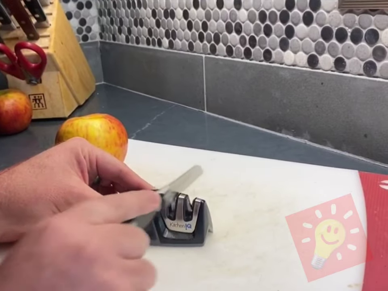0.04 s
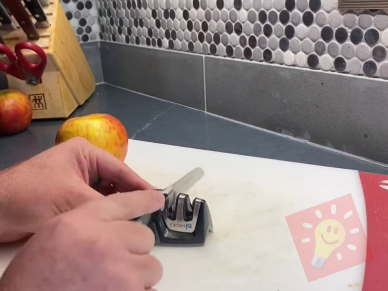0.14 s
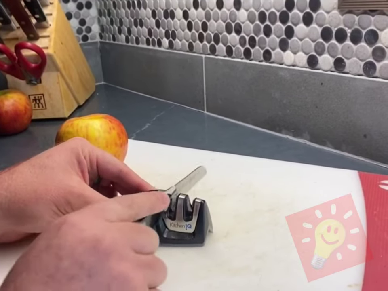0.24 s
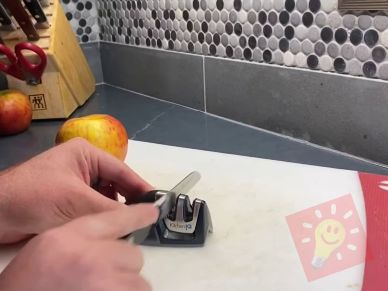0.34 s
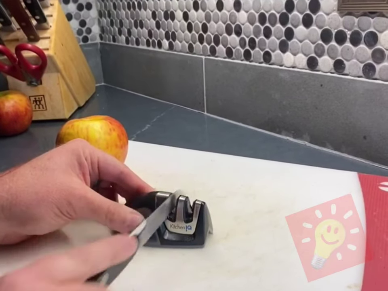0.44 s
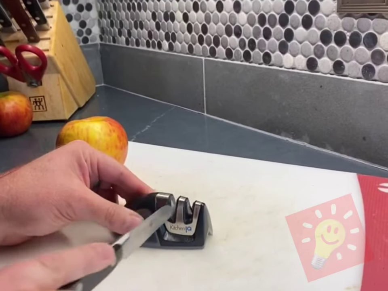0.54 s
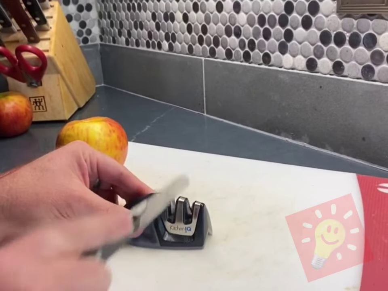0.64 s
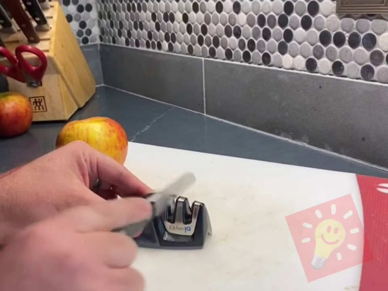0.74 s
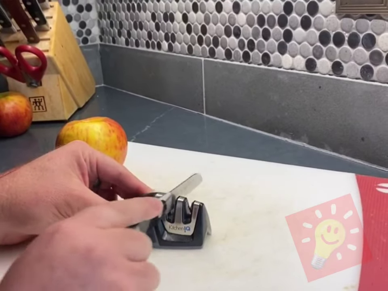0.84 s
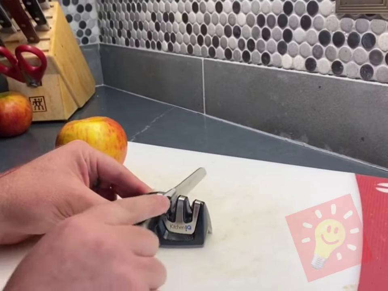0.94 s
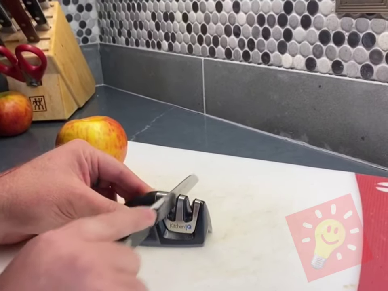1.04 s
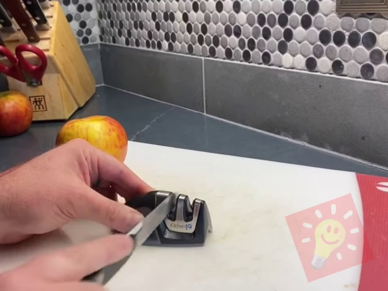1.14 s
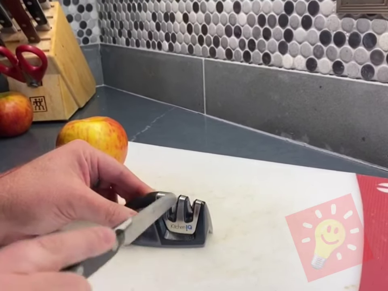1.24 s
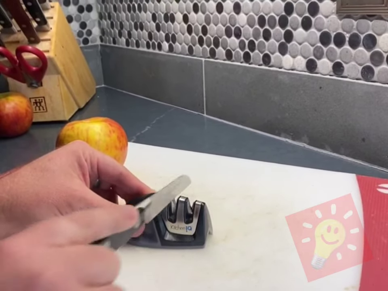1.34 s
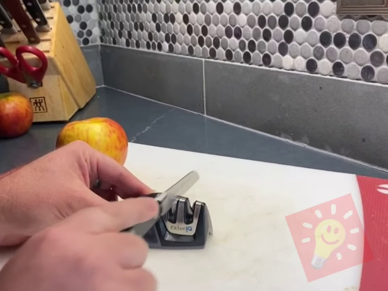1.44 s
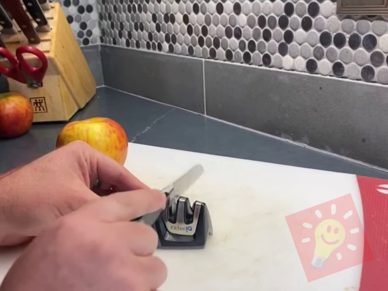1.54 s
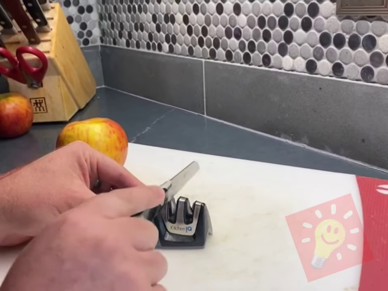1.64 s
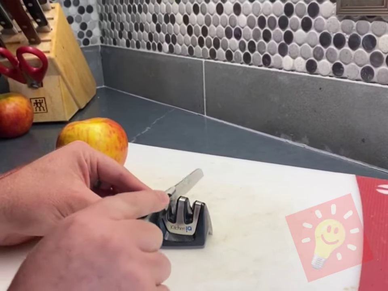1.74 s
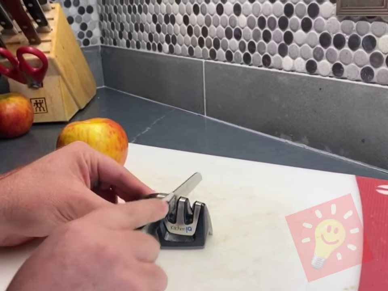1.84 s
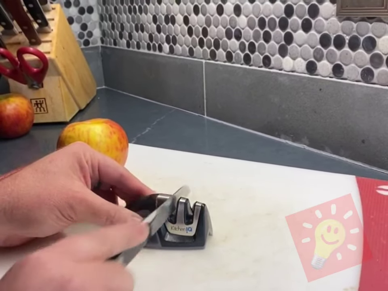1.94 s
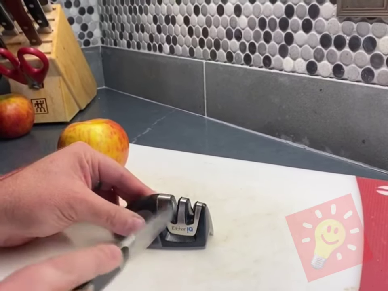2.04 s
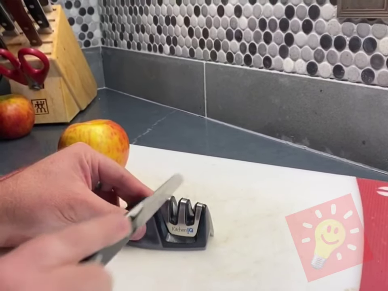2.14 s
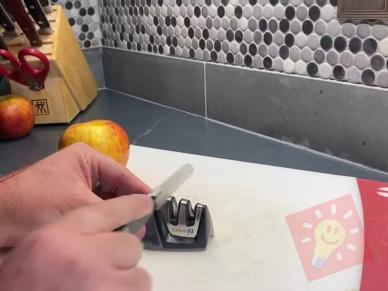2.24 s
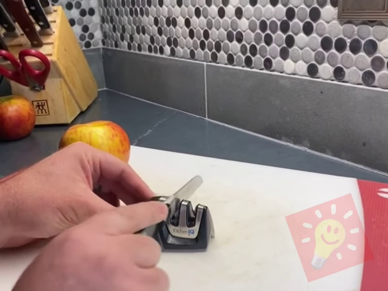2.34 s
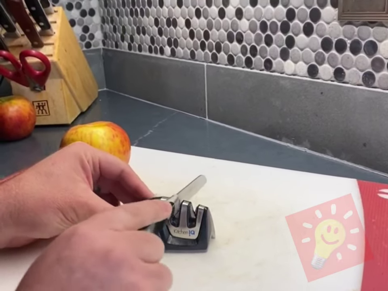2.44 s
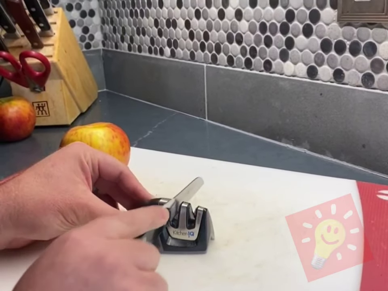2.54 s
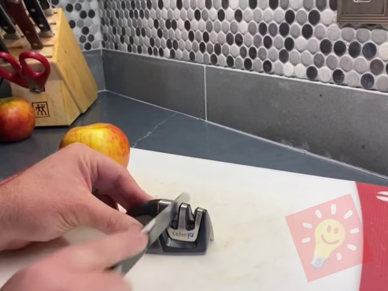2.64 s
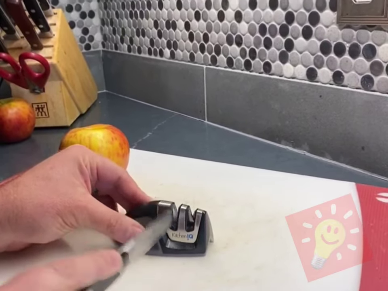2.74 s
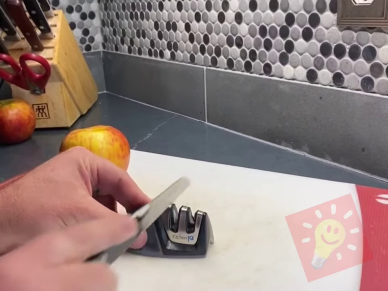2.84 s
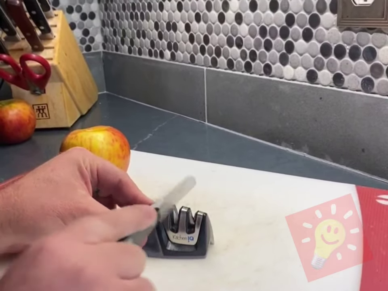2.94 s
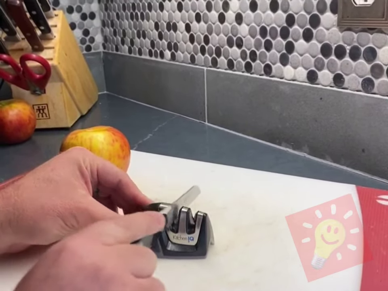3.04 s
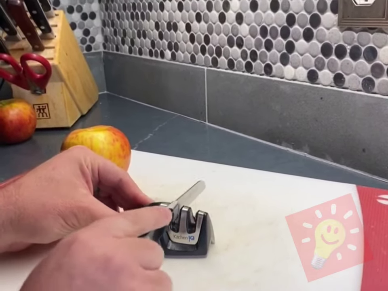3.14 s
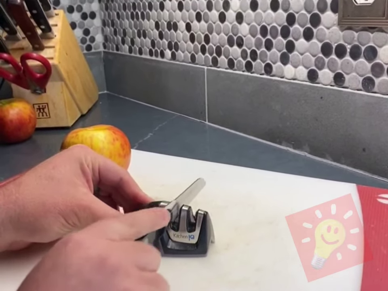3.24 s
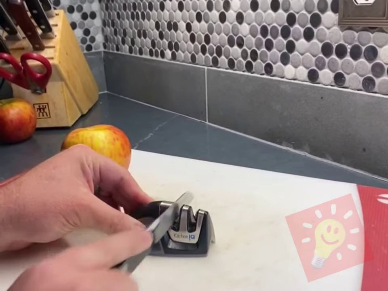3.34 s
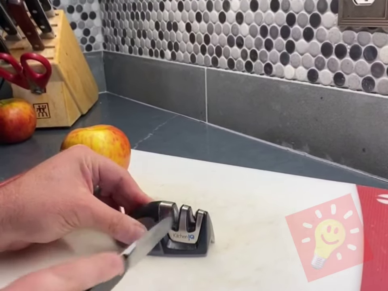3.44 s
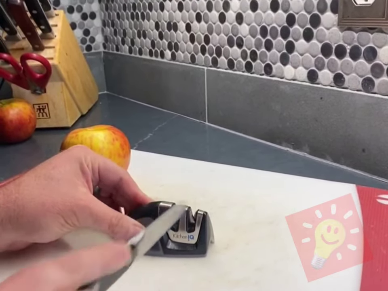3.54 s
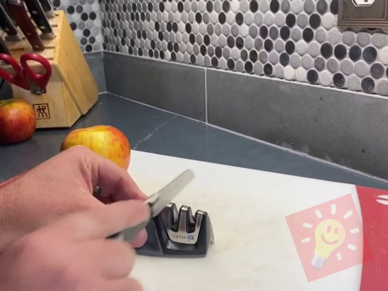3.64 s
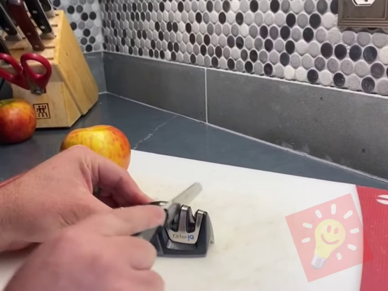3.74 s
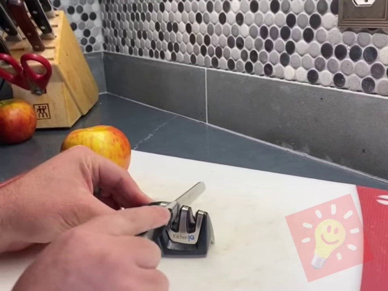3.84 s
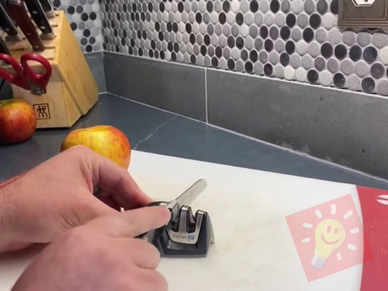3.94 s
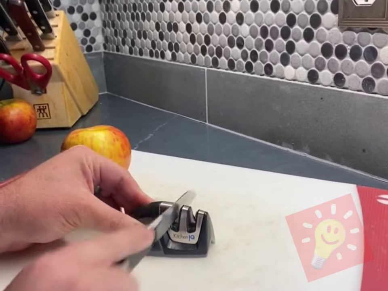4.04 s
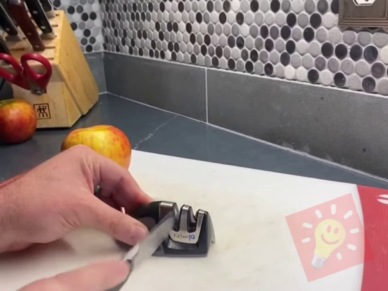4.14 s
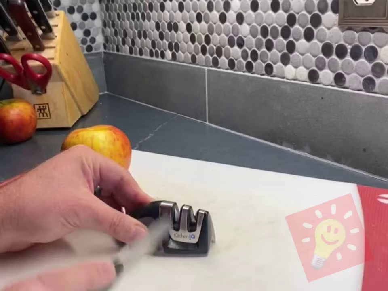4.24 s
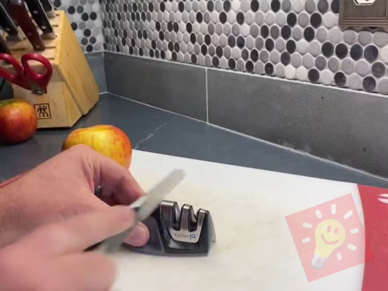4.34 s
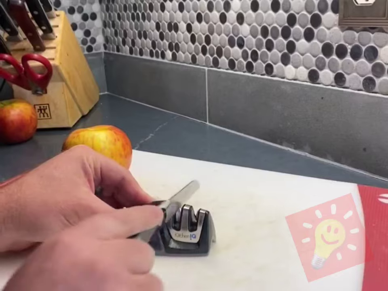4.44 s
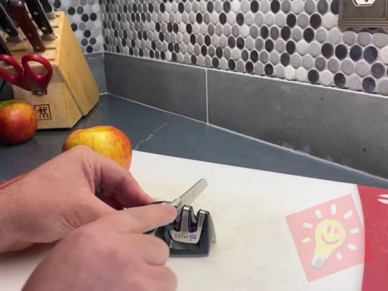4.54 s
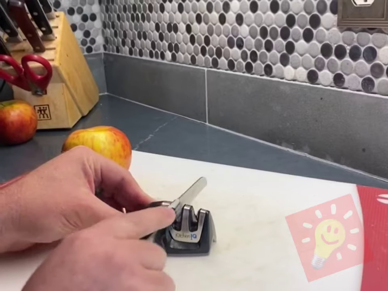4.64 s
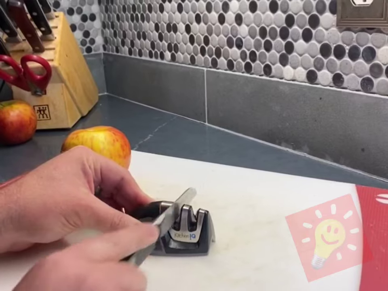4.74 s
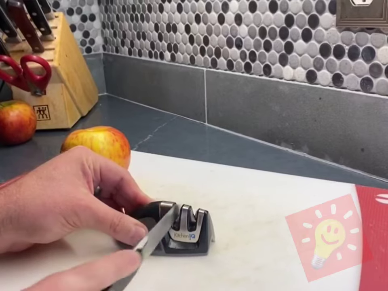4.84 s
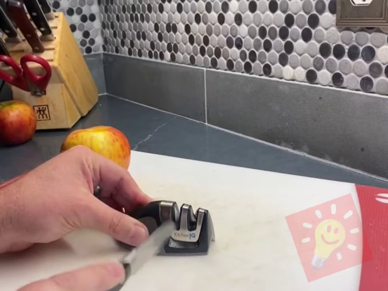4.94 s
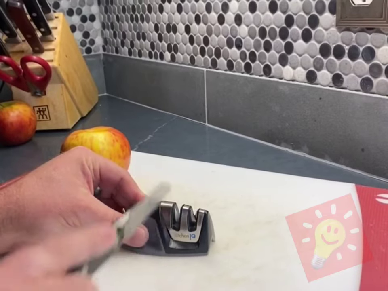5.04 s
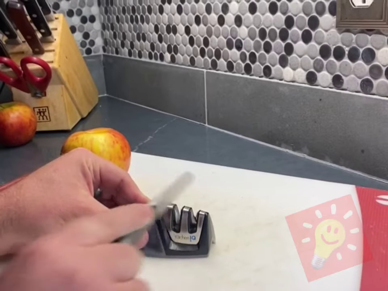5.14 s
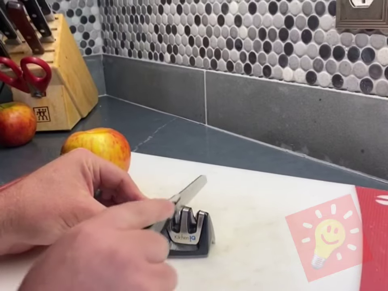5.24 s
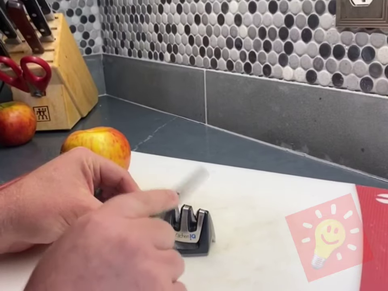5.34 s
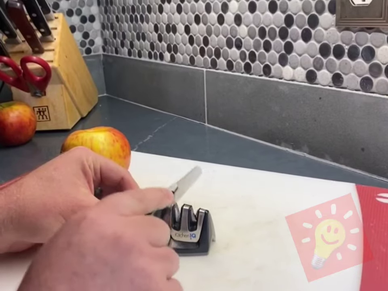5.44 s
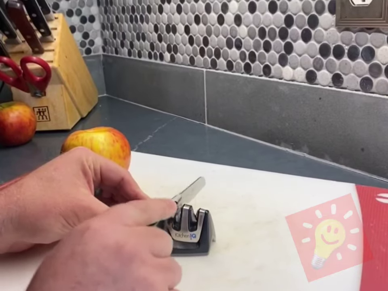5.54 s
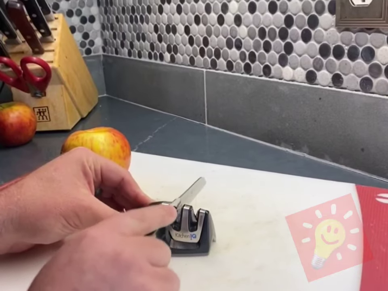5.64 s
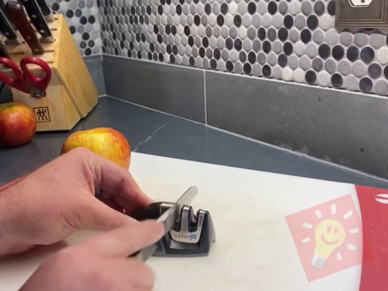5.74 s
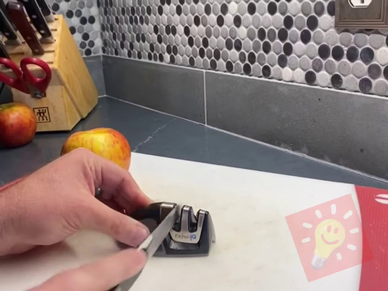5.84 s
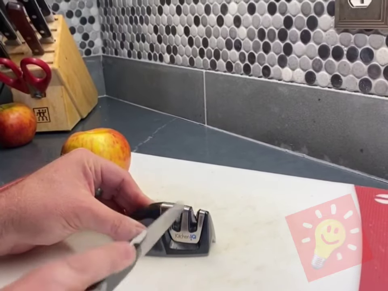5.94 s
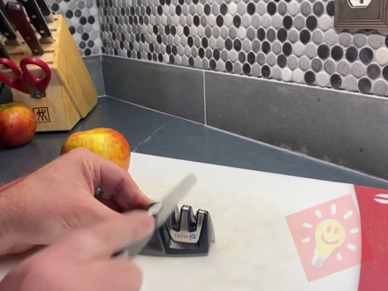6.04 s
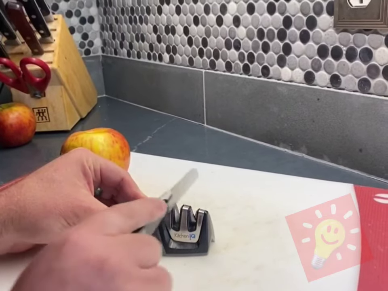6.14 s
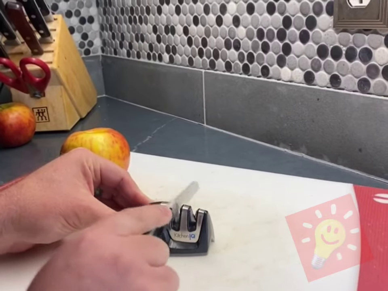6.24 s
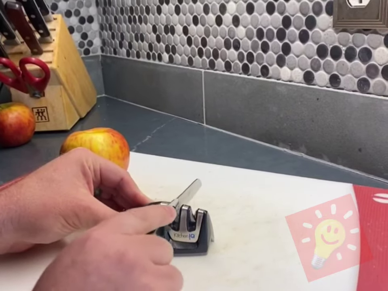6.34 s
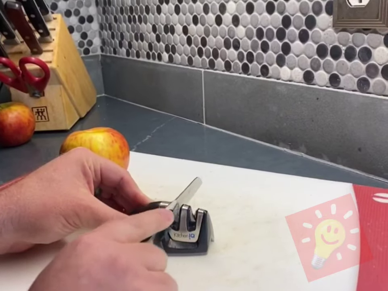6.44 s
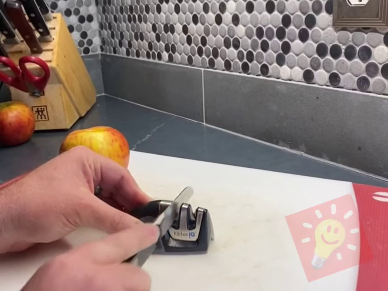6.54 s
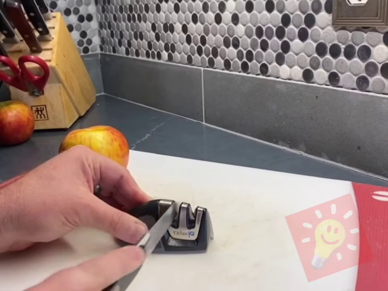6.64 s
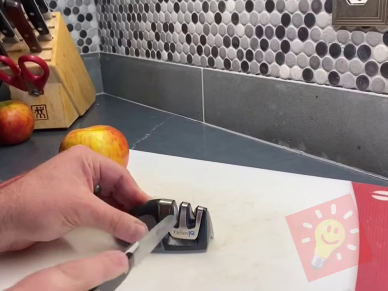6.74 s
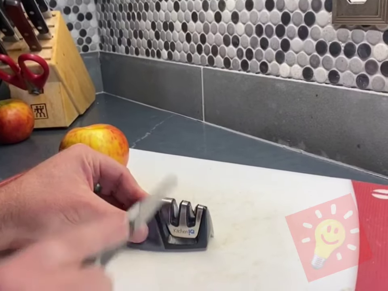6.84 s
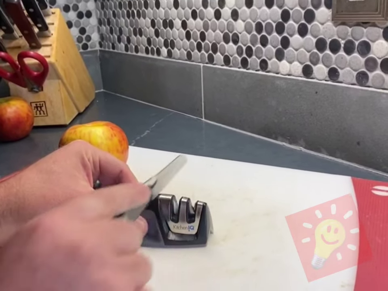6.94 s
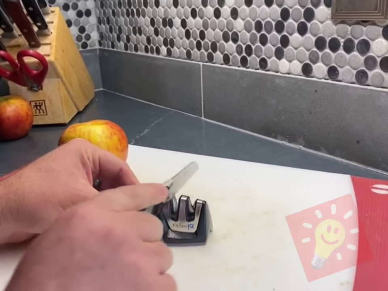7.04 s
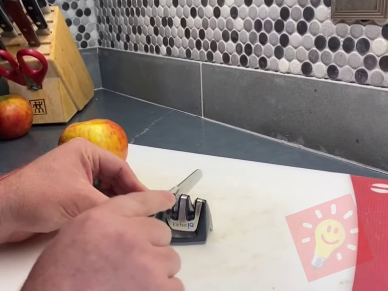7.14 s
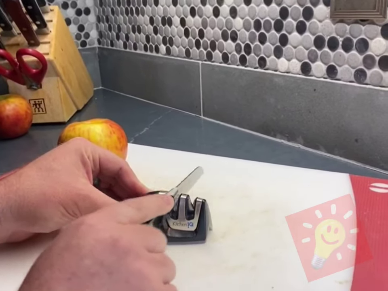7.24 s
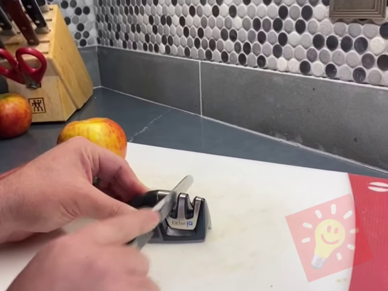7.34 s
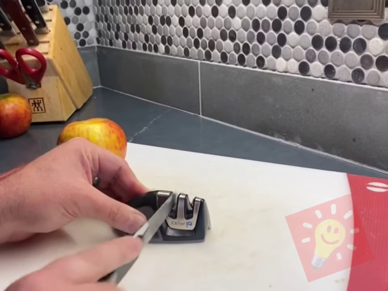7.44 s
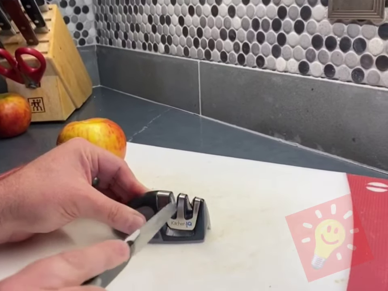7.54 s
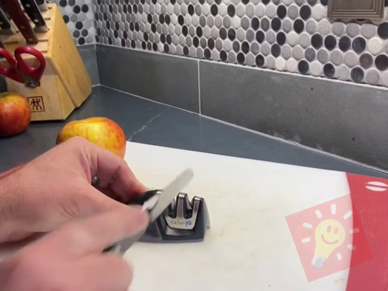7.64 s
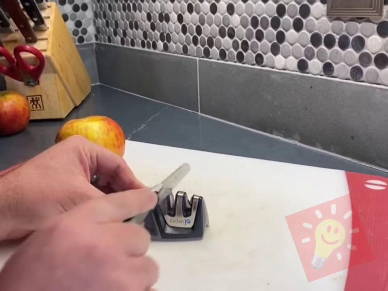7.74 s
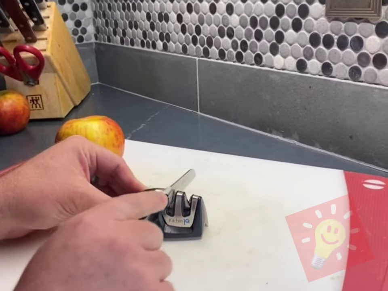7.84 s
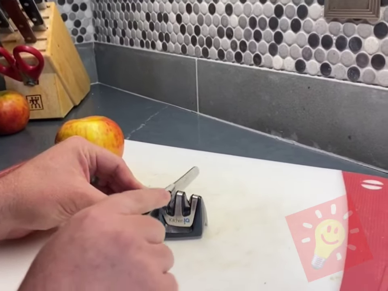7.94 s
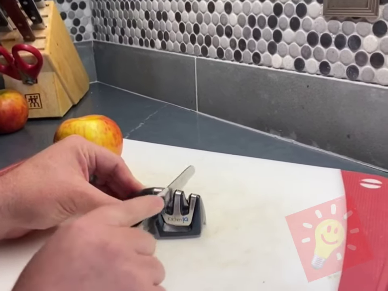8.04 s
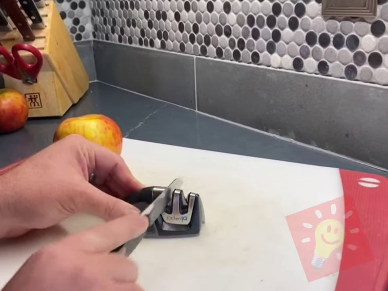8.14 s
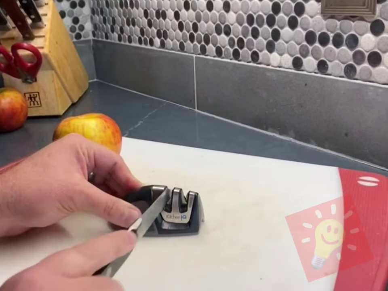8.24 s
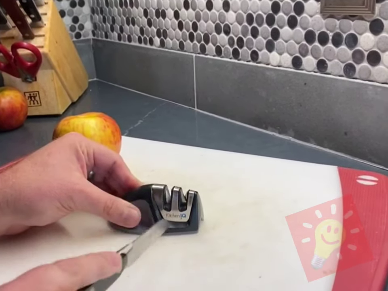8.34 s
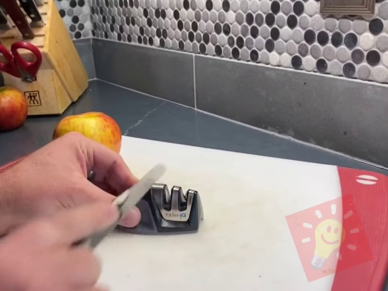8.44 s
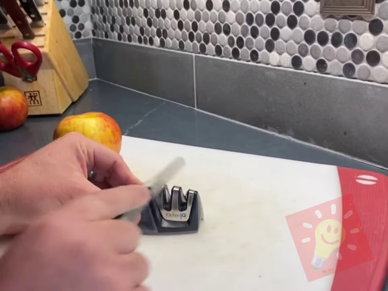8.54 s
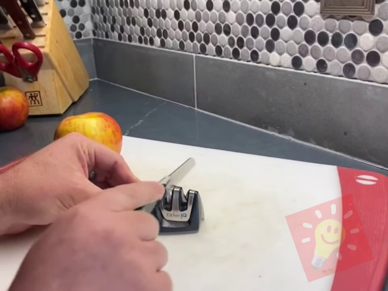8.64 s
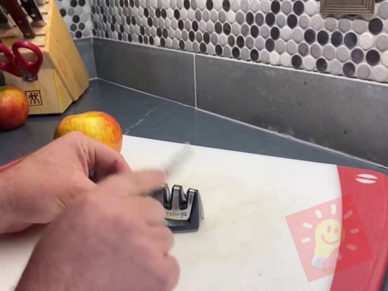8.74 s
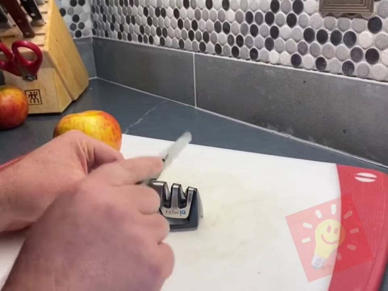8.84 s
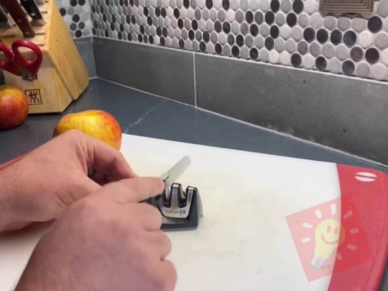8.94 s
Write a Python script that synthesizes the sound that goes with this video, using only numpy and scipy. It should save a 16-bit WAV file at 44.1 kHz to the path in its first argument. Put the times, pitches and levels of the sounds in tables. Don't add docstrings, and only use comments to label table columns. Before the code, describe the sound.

Regular knife sharpening heard close up: tick and small bump, brief raspy metallic zip that brightens toward its end, then a dry clack of the blade tip on the board. The cycle repeats roughly every 0.7 seconds, with two scrapes softer and some knocks doubled or missing. Short reflections off hard tiles surround it, over a quiet low rumble and hum.

```python
import sys
import numpy as np
from scipy import signal
from scipy.fft import rfft, irfft, next_fast_len
from scipy.io import wavfile
from scipy.ndimage import uniform_filter1d

SR = 44100
rng = np.random.default_rng(int(sys.argv[2]) if len(sys.argv) > 2 else 0)


def pcm_store(signal):
    levels = np.round(np.clip(np.atleast_2d(signal), -1, 1) * 32767)
    wavfile.write(sys.argv[1], SR, levels.astype(np.int16).T)


def linear_from_db(decibels):
    return 10 ** (np.asarray(decibels, float) / 20)


N = 395571

# (frequency [Hz], width [Hz], level [dB])
GRIND_MODES = [(1495, 120, 9), (1669, 23, 0.5), (1850, 250, 2.5), (2100, 530, 4.5), (2230, 120, -2),
               (2382, 43, -1), (2550, 52, -9), (3026, 340, -0.5), (2954, 100, -8.5), (3314, 140, 1)]
# (frequency [Hz], width [Hz], level [dB])
RING_MODES = [(3743, 200, -0.5), (4515, 110, 0), (4600, 74, 0.5), (4850, 110, 3), (5210, 170, -7),
              (5660, 78, -25)]
# (frequency [Hz], width [Hz], level [dB])
HISS_MODES = [(6650, 1100, 1.5), (7300, 140, -0.5), (8420, 430, -3.5), (9520, 300, -3), (11100, 880, -9),
              (12160, 910, 2.5), (12400, 310, -7), (12900, 2400, -2), (14700, 2600, 0.5)]


def scrape():
    grind_db, centre_hz, ring_db, hiss_db = slides()
    catch_db = catches()
    grind_db = grind_db + 1.2 * catch_db
    ring_db = ring_db + catch_db
    hiss_db = hiss_db + 1.15 * catch_db
    force = grit(per_s=9000, spread_db=1.0, judder_db=2.5)

    def near_centre(hz):
        octaves = np.log2(hz / centre_hz)
        return linear_from_db(np.maximum(-32 * octaves ** 2, -15) + 2.5 * drift(25))

    grind = modes(force, GRIND_MODES, near_centre, broad_db=-3, low_hz=1250, high_hz=3800)
    grind = grind + linear_from_db(-0.5) * gliding(force, centre_hz, width_hz=610)
    grind = grind / np.sqrt(uniform_filter1d(grind ** 2, size=3000))

    ring = modes(force, RING_MODES, lambda hz: linear_from_db(4.0 * drift(20)), broad_db=0.5, low_hz=3400, high_hz=6200)
    shimmer_s = 0.00012 * drift(14)
    ring = delayed(rms_one(ring), shimmer_s)

    hiss = modes(force, HISS_MODES, lambda hz: linear_from_db(4.5 * drift(12)), broad_db=0, low_hz=5600, high_hz=15700)
    hiss = rms_one(hiss)
    mirror_s = 0.00014 * linear_from_db(2.5 * drift(4.1))
    hiss = hiss + 0.42 * delayed(hiss, mirror_s)

    shake = rms_one(band(force, 620, 2000))
    shake_db = 0.56 * hiss_db + 0.039 * grind_db - 22
    return linear_from_db(grind_db) * grind + linear_from_db(ring_db) * ring + linear_from_db(hiss_db + 5.5) * hiss + linear_from_db(shake_db) * shake


# (start [s], length [s], pressure [dB], brightness [dB], highest grind centre [Hz])
PULLS = [(0.338, .212, -30, -1, 2770), (1.024, 0.2, -30.5, -0.5, 2530), (1.861, 0.22, -36.5, 1, 2883),
         (2.568, 0.22, -31.5, 0, 2784), (3.293, 0.22, -30.5, 1, 2770), (4.007, 0.18, -29.5, 4.5, 2740),
         (4.693, 0.26, -28, -1.5, 2743), (5.704, 0.26, -35.5, 4, 3040), (6.488, 0.25, -29, 1.5, 2747),
         (7.273, 0.26, -30, -2, 2857), (8.035, .27, -28, -0.5, 2630)]
PULL_RING_DB = [-2, -1.5, -2.5, -2, 0, -0.5, 0, -3, -1.5, -0.5, -0.5]
# (start [s], length
# [s], pressure [dB], brightness [dB], fade [dB], negative swells)
PUSHES = [(-.03, 0.064, -61, -7.5, 15), (0.115, 0.02, -46, -4.5, 4), (0.204, .008, -50, -10, -4),
          (5.675, 0.0096, -61.5, -5.5, -6), (0.81, 0.14, -43, -1, 11), (1.448, 0.17, -58.5, 0, 15.5),
          (1.801, 0.0075, -65, -5, -2.5), (2.397, 0.098, -41.5, -2, 23.5), (3.089, .14, -58, 1.5, 4),
          (3.824, 0.12, -53, 2, 13.5), (4.557, 0.075, -38.5, -2.5, 28), (5.265, 0.37, -54.5, -8.5, 28),
          (5.615, 0.026, -76, -6, -2), (6.347, 0.061, -59.5, -4, 5), (7.134, 0.05, -53.5, -24, 11),
          (7.857, 0.089, -47.5, 0, 17), (8.624, 0.14, -55.5, -2.5, 7)]
# (loudest at [share of length], level there [dB], drop at heel [dB], drop at tip [dB], share of brightness [1])
ZONES = [
    (.28, -0.43, 14, 13, 0.072),
    (.57, 1.5, 25.5, 12, 0.53),
    (.62, -8, 26, 3, 1.1),
]


def slides():
    u = np.linspace(0, 1, num=15)
    strokes = []
    for start_s, length_s, db, bright_db, top_hz, ring_db in np.column_stack([PULLS, PULL_RING_DB]):
        grind, ring, hiss = (db + zone_db + share * bright_db + arch(u, top_at, heel_db, tip_db)
                             for top_at, zone_db, heel_db, tip_db, share in ZONES)
        centre_hz = top_hz * (1 + arch(u, 0.94, 1 - 0.72, 1 - 0.93))
        strokes.append(np.transpose([start_s + length_s * u, grind, centre_hz, ring + ring_db, hiss]))
    for start_s, length_s, db, bright_db, fade_db in PUSHES:
        grind = db - fade_db * u ** 0.65
        centre_hz = 2450 + 0 * u
        strokes.append(np.transpose([start_s + length_s * u, grind, centre_hz, grind + 1.5, grind + bright_db]))
    # (time [s], grind [dB], centre [Hz], ring [dB], hiss [dB])
    bite = np.array([-.012, -45, 0, -45, -45])
    hold = np.array([.012, -2, 0, -2, -2])
    lift = np.array([.026, -45, 0, -45, -45])
    rows = []
    for stroke in strokes:
        rows += [stroke[0] + bite, *stroke, stroke[-1] + hold, stroke[-1] + lift]
    time_s, *columns = np.transpose(sorted(rows, key=lambda row: row[0]))
    return [np.interp(np.arange(N) / SR, time_s, column) for column in columns]


def arch(u, top_at, heel_drop, tip_drop):
    heel = np.maximum(1 - u / top_at, 0) ** 2
    tip = np.maximum((u - top_at) / max(1 - top_at, 1e-2), 0)
    return -heel_drop * heel - tip_drop * tip


# (time [s], boost [dB], half length
# [s])
CATCHES = [(0.4, 9, 0.0077), (1.081, 5, 0.006), (1.144, 3.5, 0.0024), (1.168, 10, 0.0098),
           (2.695, 8.5, 0.011), (3.392, 8, 0.0087), (4.7, 9.5, .004), (4.71, 0, 0.022), (0.27, -3.5, .008),
           (6.9, 4, .006), (4.943, 9.5, 0.0044), (5.944, 12.5, 0.01), (8.312, 14, 0.0036),
           (2.06, 2.5, 0.033), (2.79, 3.5, .01), (8.057, 6, .01), (0.66, -0.5, 0.0073), (3.3, -0.5, 0.0027),
           (4.868, -1, 0.0037), (8.25, -5, .04), (1.9, -0.5, 0.016), (4.7, 4.5, .003), (1.135, 4.5, .004),
           (6.7, 1, .005), (3.32, 2, 0.013), (4.817, 9, 0.0064), (4, 3.5, 0.0042), (8.147, -1, 0.011),
           (4.101, 2.5, 0.0056), (4.124, 6.5, 0.0029), (6.588, 8.5, 0.0083), (7.2, 11, 0.0062),
           (6.648, 5.5, 0.0037), (1.978, 3.5, 0.0098), (0.349, 3.5, 0.0046), (7.394, 5, 0.0057),
           (7.419, -1, 0.0061)]


def catches():
    boost_db = np.zeros(N)
    for time_s, db, half_s in CATCHES:
        near = np.arange(round((time_s - .06) * SR), round((time_s + .06) * SR))
        boost_db[near] += db * np.exp(-((near / SR - time_s) / half_s) ** 4)
    return boost_db


def grit(per_s, spread_db, judder_db):
    sizes = linear_from_db(spread_db * np.minimum(rng.exponential(1, N), 5)) * rng.choice([-1, 1], N)
    grains = sizes * (rng.random(N) < per_s / SR)
    judder = drift(45) + 0.41 * drift(280)
    return rms_one(grains) * linear_from_db(judder_db * judder)


def modes(force, peaks, weights, broad_db, low_hz, high_hz):
    out = linear_from_db(broad_db) * rms_one(band(force, low_hz, high_hz))
    for k, (hz, width_hz, level_db) in enumerate(peaks):
        mode = rms_one(resonance(force, hz, width_hz))
        out = out + (-1) ** k * linear_from_db(level_db) * mode * weights(hz)
    return out


def gliding(force, centre_hz, width_hz):
    turn = np.exp(2j * np.pi * np.cumsum(centre_hz) / SR)
    r = np.exp(-np.pi * width_hz / SR)
    smooth = signal.lfilter([1], [1, -2 * r, r * r], force / turn)
    return rms_one((smooth * turn).real)


# (start [s], length [s], from [Hz], to [Hz], level [dB])
SQUEALS = [(0.364, 0.099, 1600, 1543, -36.5), (0.405, 0.03, 2550, 2290, -43.5),
           (0.816, 0.11, 2400, 2400, -63), (1.048, 0.048, 1600, 1600, -29.5),
           (1.093, 0.08, 2550, 2870, -33), (1.878, 0.094, 1600, 1700, -45),
           (2.604, 0.084, 2400, 2450, -33.5), (2.614, 0.056, 1470, 1600, -39),
           (3.316, 0.065, 1920, 2460, -28.5), (3.373, 0.081, 2680, 2975, -32.5),
           (4.02, 0.069, 1480, 1663, -32.5), (4.03, 0.064, 2090, 2400, -34.5),
           (4.708, 0.13, 2500, 2775, -38.5), (5.76, 0.04, 2790, 2890, -56),
           (6.513, 0.095, 1550, 1625, -36.5), (6.555, 0.071, 2735, 2570, -32.5),
           (7.293, .04, 2820, 2860, -33.5), (7.341, 0.062, 2834, 2850, -29.5),
           (7.332, 0.084, 2550, 2580, -30), (7.291, 0.084, 2140, 2300, -40),
           (7.343, 0.045, 1620, 1700, -35.5), (0.427, 0.022, 4620, 4800, -27),
           (1.047, 0.042, 2040, 2090, -30.5), (5.825, 0.013, 3150, 3200, -30),
           (4.786, .05, 3300, 3300, -34), (4.797, 0.052, 2120, 2150, -35.5),
           (8.202, 0.047, 2450, 2400, -32), (2.672, 0.033, 5060, 4900, -32),
           (8.068, 0.034, 1850, 1994, -22.5), (8.111, 0.088, 2550, 2600, -30.5),
           (8.125, .05, 3200, 3250, -43), (8.63, 0.13, 2485, 2330, -51), (1.215, 0.015, 4640, 4620, -24),
           (5.81, 0.021, 6720, 6600, -31.5), (6.715, 0.021, 4800, 4750, -28.5),
           (0.401, .07, 2910, 3150, -37), (1.119, 0.018, 4900, 4900, -34)]


def squeals():
    out = np.zeros(N)
    force = grit(per_s=26000, spread_db=6.0, judder_db=-2.5)
    for start_s, length_s, from_hz, to_hz, db in SQUEALS:
        span = slice(round(start_s * SR), round((start_s + length_s) * SR))
        u = np.linspace(0, 1, len(force[span]))
        swell = np.sin(np.pi * u) ** 0.16
        out[span] += linear_from_db(db) * swell * gliding(force[span], from_hz + (to_hz - from_hz) * u, width_hz=110)
    return out


# (frequency [Hz], level [dB], t60 [s])
THUD_MODES = [(110, -7.5, 0.092), (186, -9, 0.071), (372, -2, 0.038), (396, -4.5, 0.034), (555, 3, 0.019)]
# (frequency [Hz], level [dB], t60 [s])
BOARD_MODES = [(599, -10.5, 0.022), (635, -8, 0.0089), (840, -9.5, 0.026), (995, -8.5, 0.021),
               (1100, -3.5, 0.02), (1173, -2.5, 0.019), (1421, 1.5, 0.018), (1512, 9.5, 0.0088),
               (1599, 3, 0.011), (1900, 4, 0.011), (2030, -5.5, 0.015), (2400, -12, 0.034),
               (1700, 9.5, .003)]


def knocks():
    edge_late_s, blade_late_s, board_late_s = 0.0016, 0.0026, 0.003
    push = contact(column=0, length_s=0.000074, late_s=board_late_s, rough=0.6)
    thud = linear_from_db(-3.5) * band(struck(push, THUD_MODES), 100, 1700)
    rap = contact(column=1, length_s=0.00006, late_s=board_late_s, rough=0.16)
    knock = linear_from_db(-4.5) * band(struck(rap, BOARD_MODES), 360, 3900)

    steel = contact(column=2, length_s=0.00068, late_s=blade_late_s)
    blade = 0
    for k, (hz, width_hz, db) in enumerate(GRIND_MODES[-6:] + RING_MODES[1:]):
        blade = blade + (-1) ** k * linear_from_db(db) * resonance(steel, hz, 1.9 * width_hz)
    crack = linear_from_db(21.0) * band(steel, 2300, 2800) + linear_from_db(15.5) * band(steel, 2100, 8900)

    edge = contact(column=3, length_s=0.0006, late_s=edge_late_s)
    tick = sum(linear_from_db(db) * resonance(edge, hz, 8.26 * width_hz) for hz, width_hz, db in HISS_MODES)
    tick = linear_from_db(14.0) * tick + linear_from_db(15.0) * band(edge, 10000, 16000)
    return thud + knock + linear_from_db(24.0) * blade + crack + tick


# (time [s], board [dB], blade [dB], edge tick [dB])
SET_INS = [(0.113, -44.5, -30.5, -42.5), (0.807, -41.5, -29.5, -39), (1.443, -31, -28.5, -36),
           (1.779, -47.5, -37.5, -45), (2.392, -51, -40, -40.5), (3.075, -38.5, -34.5, -38),
           (3.807, -42.5, -30, -36), (4.531, -36.5, -54.5, -27.5), (5.254, -29, -27, -38.5),
           (5.578, -32.5, -33, -40.5), (6.32, -37, -27, -32), (7.137, -28, -31, -26.5),
           (7.853, -45, -42, -36), (8.614, -39.5, -37, -52)]
# (time [s], board [dB], blade [dB], edge tick [dB])
BUMPS = [(0.173, -43, -55, -38), (0.219, -23.5, -36, -28.5), (0.877, -45, -50, -32),
         (0.961, -40.5, -67.5, -60), (1.025, -34.5, -32.5, -50.5), (1.473, -25, -34, -51),
         (1.596, -45, -49, -73), (1.825, -33, -42.5, -40.5), (2.091, -44.5, -48, -47),
         (2.332, -80.5, -55, -67), (3.11, -33, -34, -34.5), (3.833, -31.5, -30.5, -38),
         (4.57, -24, -49, -32.5), (4.618, -39, -67, -55), (4.697, -39, -45.5, -51.5),
         (5.271, -32.5, -40.5, -47), (5.404, -50.5, -69, -78), (5.685, -25, -28, -34),
         (7.172, -28.5, -34, -31.5), (7.246, -36, -73, -44.5), (7.891, -43.5, -59.5, -38),
         (8.033, -36.5, -41, -58), (7.951, -36.5, -41, -68), (8.764, -47.5, -43, -62),
         (3.274, -64, -61, -66), (3.99, -59, -58, -65.5), (6.465, -64, -58, -66),
         (3.096, -51.5, -36.5, -43)]
# (time [s], board [dB], blade [dB], edge tick [dB])
DROPS = [(0.566, -9.5, -9.5, -20), (1.222, -37.5, -17.5, -22.5), (2.808, -54.5, -65.5, -55.5),
         (3.48, -35.5, -18, -17.5), (3.507, -10.5, -15, -29.5), (4.21, -5.5, -8.5, -20),
         (4.255, -77, -39.5, -83.5), (4.921, -42, -21.5, -35.5), (4.952, -8, -10.5, -21.5),
         (5.014, -26, -18.5, -22.5), (5.828, -53, -49.5, -35.5), (5.951, -6.5, -8.5, -21.5),
         (6.72, -40, -16, -21.5), (6.755, -13.5, -14.5, -31), (7.521, -6, -5.5, -22), (8.318, -6, -13, -19),
         (8.366, -14.5, -17, -26.5)]


def contact(column, length_s, late_s=0.0, rough=1.0):
    hits = np.array(SET_INS + BUMPS + DROPS)
    force = np.zeros(N + 2000)
    strength_db = hits[:, column]
    if column == 0:
        set_in_db, bump_db, drop_db = -21.5, -20.5, -24
        base_db = np.repeat([set_in_db, bump_db, drop_db], [len(SET_INS), len(BUMPS), len(DROPS)])
        strength_db = base_db + 0.57 * hits[:, 1]
    t = np.maximum(np.arange(2000) / SR - late_s, 0)
    texture = 1 - rough + rough * rng.standard_normal((len(hits), 2000))
    bursts = texture * t / length_s * np.exp(1 - t / length_s)
    for time_s, db, burst in zip(hits[:, 0], strength_db, bursts):
        start = round(time_s * SR)
        force[start:start + 2000] += linear_from_db(db) * burst / np.sqrt(np.sum(burst ** 2))
    return force[:N] + 1e-18


def struck(force, table):
    out = 0
    for k, (hz, level_db, t60_s) in enumerate(table):
        r = linear_from_db(-60 / (t60_s * SR))
        w = 2 * np.pi * hz / SR
        mode = signal.lfilter([0, np.sin(w)], [1, -2 * r * np.cos(w), r * r], force)
        out = out + (-1) ** k * linear_from_db(level_db) * mode
    return out


# (time [s], level [dB])
SHOVES = [(0.961, -50.5), (2.468, -60), (2.798, -53), (3.131, -46), (3.9, -51), (4.592, -40), (5.3, -52.5),
          (6.389, -54.5), (7.411, -50.5), (7.54, -44.5), (0.6, -51), (1.25, -56), (1.95, -57)]


def shoves():
    t = np.arange(N) / SR
    swell = sum(linear_from_db(db) * np.exp(-((t - time_s) / 0.035) ** 2) for time_s, db in SHOVES)
    return swell * rms_one(band(rng.standard_normal(N), 120, 420))


# (frequency [Hz], early [dB], early t60 [s], late [dB], late t60 [s], left-right likeness [1])
KITCHEN = [(150, -13.5, 0.34, -18, 1, 0.36), (554.3, -7.5, 0.093, -17, 0.48, -0.21),
           (1030, -6, 0.053, -13.5, 0.46, 0.053), (1600, -2.5, 0.072, -10.5, 0.52, -0.16),
           (2500, -2, .07, -16, .49, 0.3), (3960, 3, 0.046, -17.5, 0.49, 0.3),
           (8200, 3.5, 0.034, -14, 0.33, 1), (14400, 4, 0.016, -25.5, 0.062, 0.91)]
# (frequency [Hz], left minus right [dB])
LEAN = [(60, 5), (110, -3), (200, 1), (380, 6), (700, 1.5), (1290, -2.5), (2380, -1.5), (4400, -2.5),
        (8120, -1), (15000, 1)]


def kitchen(x, lag_s, wet_db, rise_s, order):
    t = np.arange(SR) / SR
    fft_size = 16 * next_fast_len((N + SR) // 16 + 1)
    white = rng.standard_normal((2, 2, SR))
    edges_hz = 100 * 2 ** np.arange(0, 7.6, .5)
    response = 0
    for k, (low, high) in enumerate(zip(edges_hz, edges_hz[1:])):
        early_db, early_s, late_db, late_s, alike = (at_hz(KITCHEN, low * 1.04, axis=a) for a in range(1, 6))
        mid, side = band(white[k % 2], low, high)
        alike = np.clip(alike, -1, 1)
        early = linear_from_db(early_db - 60 * t / early_s) / np.sqrt(early_s)
        late = linear_from_db(late_db - 60 * t / late_s) / np.sqrt(late_s)
        ears = np.sqrt(1 + alike) * mid + np.sqrt(1 - alike) * side * [[1], [-1]]
        response = response + (early + late) * ears
    hz = np.fft.rfftfreq(fft_size, 1 / SR) + 1
    wet = linear_from_db(wet_db) * np.sqrt(6 * np.log(10) / SR / 2)
    paths = rfft(response * np.clip(t / rise_s, 0, 1), fft_size) * wet
    paths += np.exp(-2j * np.pi * hz * lag_s * np.array([[1], [0]]))
    power = uniform_filter1d(np.abs(paths) ** 2, size=fft_size // order)
    paths *= minimum_phase(1 / np.sqrt(power))
    lean = linear_from_db(at_hz(LEAN, hz) / 2 * np.array([[1], [-1]]))
    return irfft(rfft(x, fft_size) * paths * lean, fft_size)[:, :N]


def minimum_phase(gain):
    c = irfft(np.log(gain[:, ::8]))
    half = c.shape[1] // 2
    c[:, 1:half] *= 2
    c[:, half + 1:] = 0
    return rfft(irfft(np.exp(rfft(c))), 2 * gain.shape[1] - 2)


# (frequency [Hz], level [dB per Hz])
RUMBLE = [(15, -32), (25, -8), (80, -4.5), (117, -9), (197, -16.5), (300, -17), (485, -48.5), (1040, -58),
          (1400, -46.5), (3000, -43), (3900, -77), (6600, -120)]
# (time [s], level [dB])
RUMBLE_DB = [(0.0, -64), (0.67, -60.5), (1.5, -65), (2.001, -60), (2.95, -64.5), (3.35, -60), (3.7, -63.5),
             (4.77, -60), (5.27, -62), (5.57, -63), (7.87, -59), (8.02, -50.5), (8.97, -66.5)]


def rumble():
    edges_hz = 42 * 2 ** np.arange(0, 6.1, .5)
    white = rng.standard_normal((2, 2, N))
    out = 0
    for k, (low, high) in enumerate(zip(edges_hz, edges_hz[1:])):
        mid, side = band(white[k % 2], low, high)
        side_db = np.interp(np.log2(low / 50), [0, 4], [-17, -4])
        level = linear_from_db(at_hz(RUMBLE, low * 1.3) + 1.2 * drift(3.8))
        out = out + level * (mid + linear_from_db(side_db) * side * [[1], [-1]])
    level_db = np.interp(np.arange(N) / SR, *np.transpose(RUMBLE_DB)) + 4.5
    hum = linear_from_db(-67.5) * rms_one(resonance(white[0, 0], hz=60, width_hz=6))
    return linear_from_db(level_db) * rms_one(out) + hum


def rms_one(x):
    return x / np.sqrt(np.mean(x ** 2) + 1e-20)


def at_hz(points, hz, axis=1):
    points = np.array(points)
    return np.interp(np.log(hz), np.log(points[:, 0]), points[:, axis])


def band(x, low_hz, high_hz, order=2):
    edges_hz = [low_hz, min(high_hz, .47 * SR)]
    return signal.sosfilt(signal.butter(order, edges_hz, "band", fs=SR, output="sos"), x)


def drift(rate_hz):
    r = np.exp(-2 * np.pi * rate_hz / SR)
    slow = signal.lfilter([1], [1, -2 * r, r * r], rng.standard_normal(N + 20000))
    return rms_one(slow[20000:])


def resonance(x, hz, width_hz):
    r = np.exp(-np.pi * width_hz / SR)
    poles = [1, -2 * r * np.cos(2 * np.pi * hz / SR), r * r]
    return signal.lfilter([(1 - r * r) / 2, 0, (r * r - 1) / 2], poles, x)


def delayed(x, lag_s):
    return np.interp(np.arange(N) - lag_s * SR, np.arange(N), x)


def scene():
    slot = kitchen(scrape() + squeals(), lag_s=3.6e-5, wet_db=7.5, rise_s=0.00074, order=600)
    board = kitchen(knocks() + shoves(), lag_s=3.6e-5, wet_db=4.5, rise_s=0.0035, order=380)
    return slot + board + rumble()


def low_pass(x):
    return signal.sosfilt(signal.butter(12, 16810, fs=SR, output="sos"), x)


def record(dry):
    x = signal.sosfilt(signal.cheby2(10, 60, 16600, fs=SR, output="sos"), dry)
    x = 1.5 * np.tanh(x / 1.5)
    return low_pass(x)


dry = scene()
out = record(dry)
pcm_store(out)
```